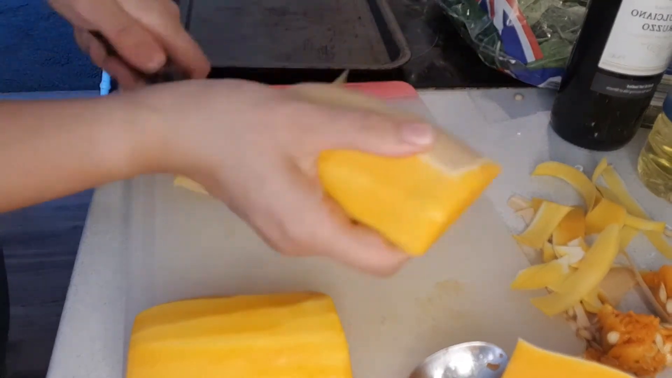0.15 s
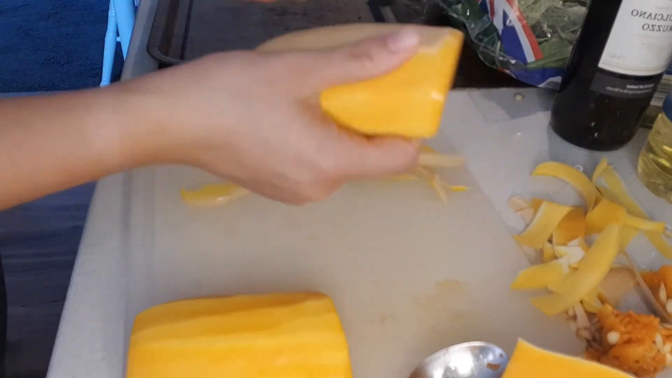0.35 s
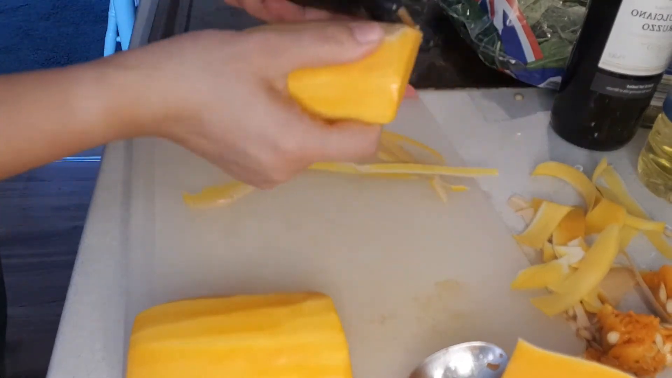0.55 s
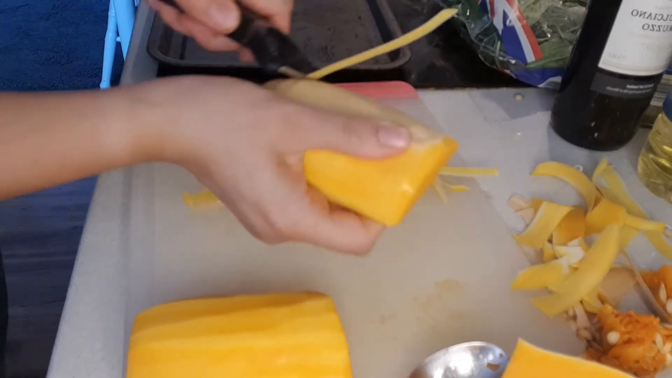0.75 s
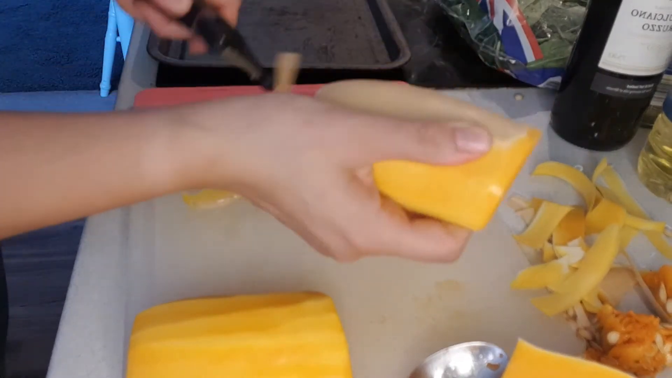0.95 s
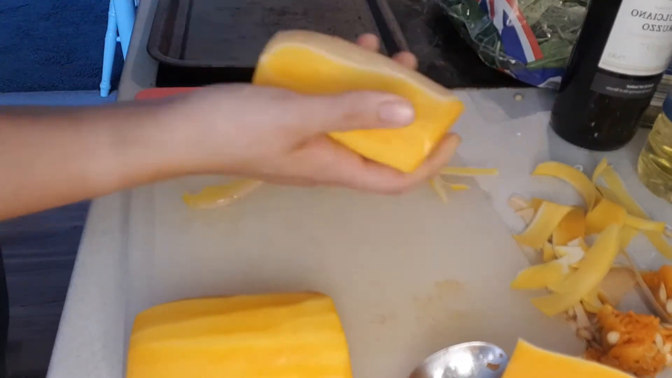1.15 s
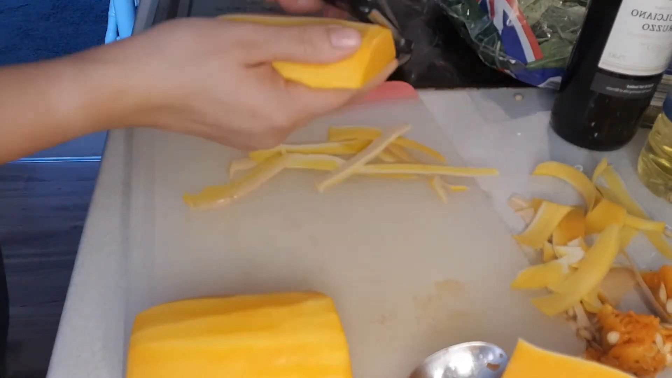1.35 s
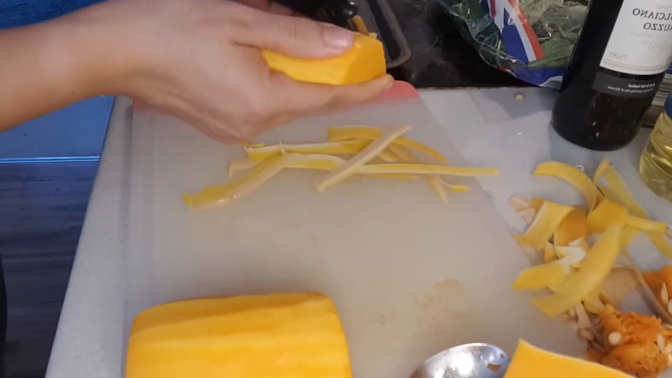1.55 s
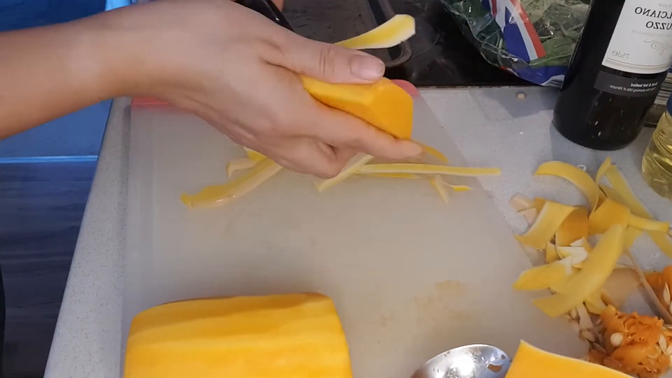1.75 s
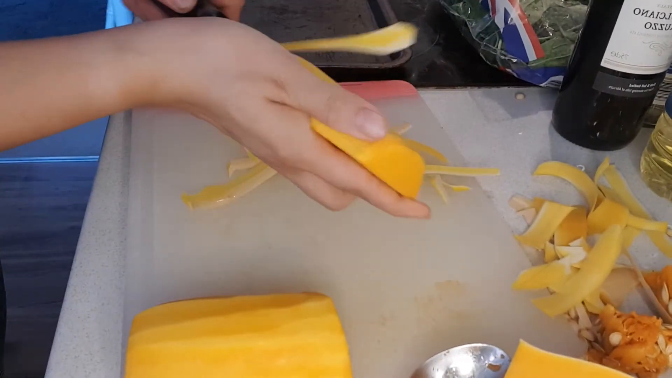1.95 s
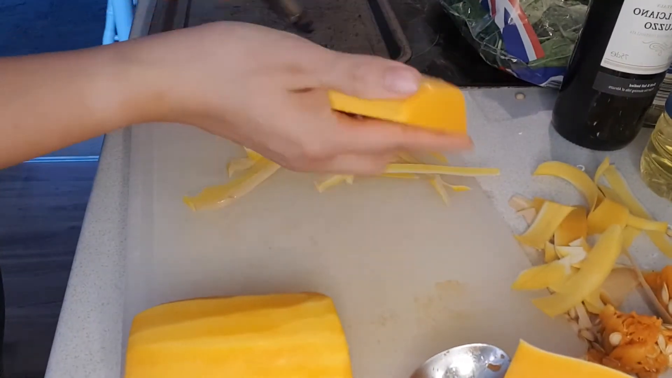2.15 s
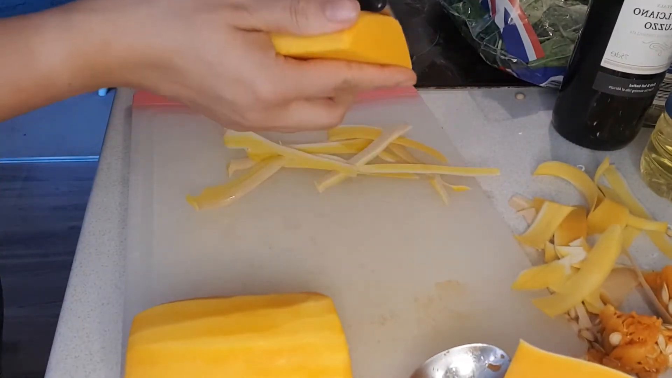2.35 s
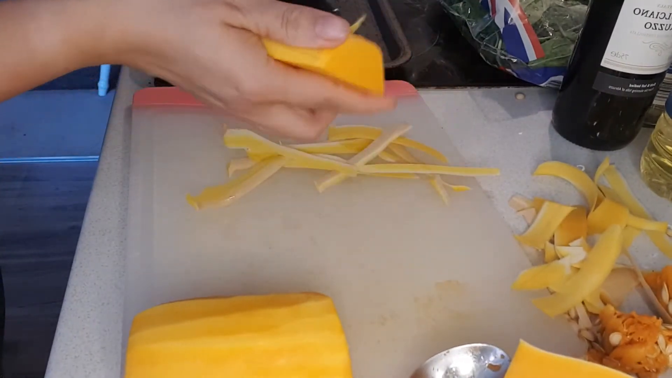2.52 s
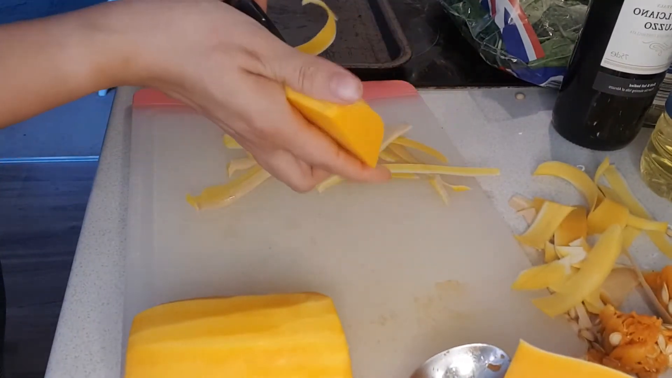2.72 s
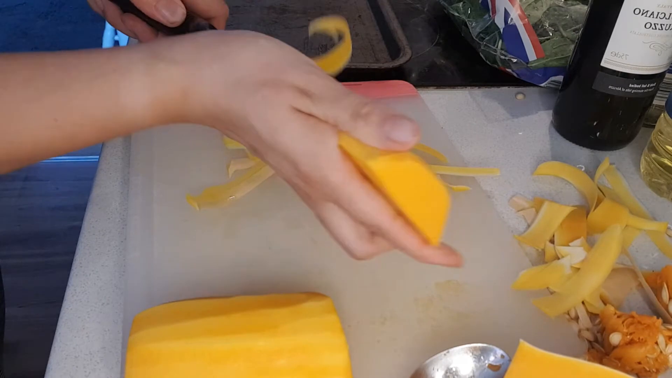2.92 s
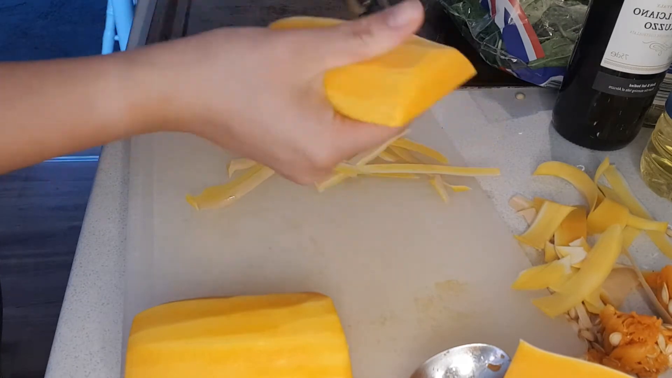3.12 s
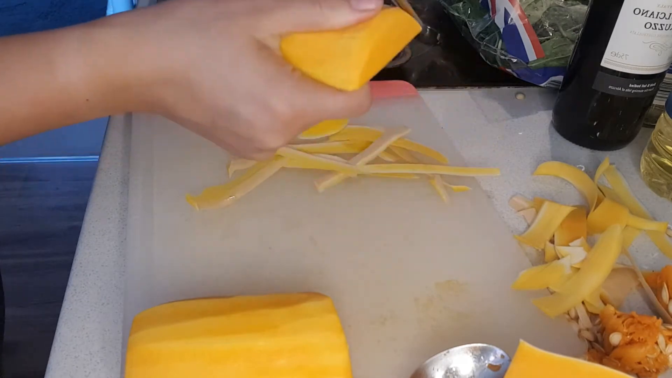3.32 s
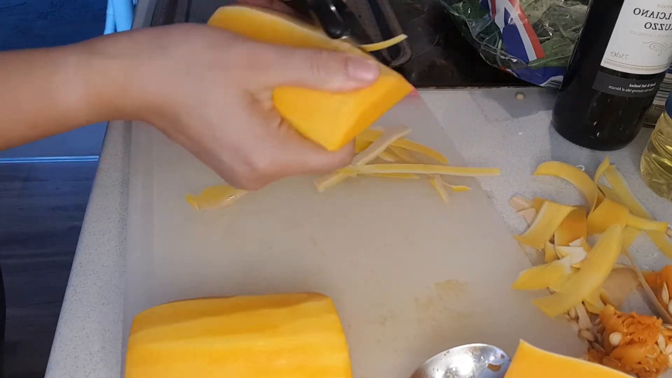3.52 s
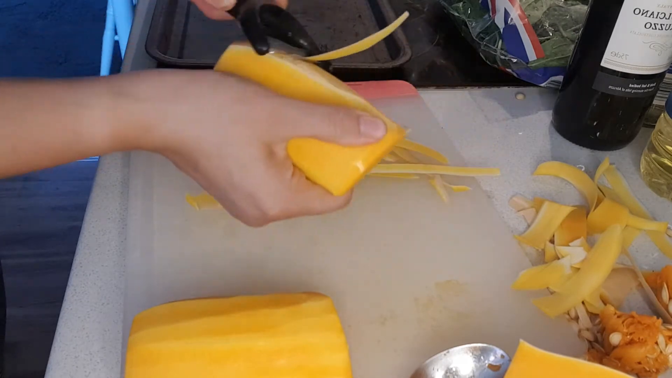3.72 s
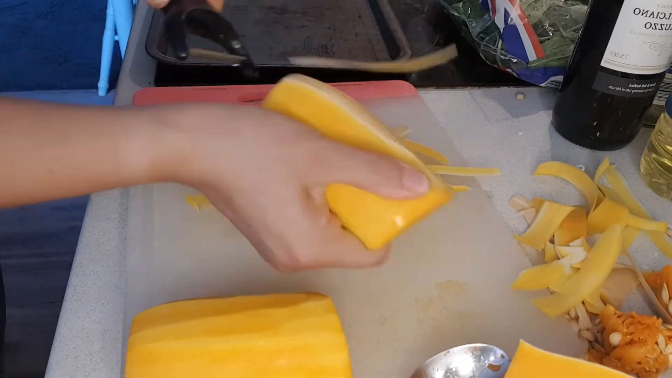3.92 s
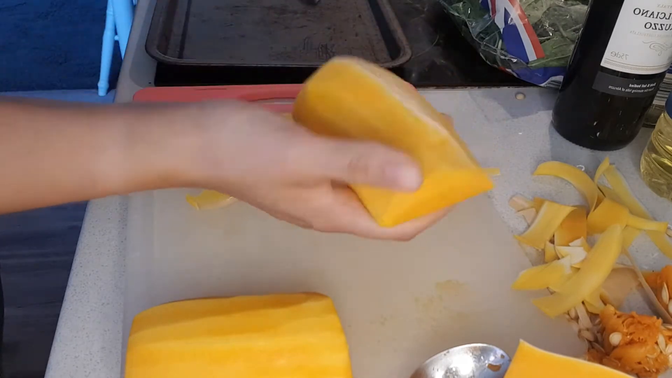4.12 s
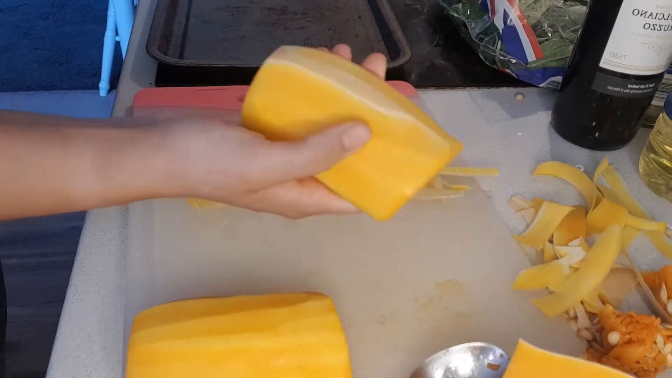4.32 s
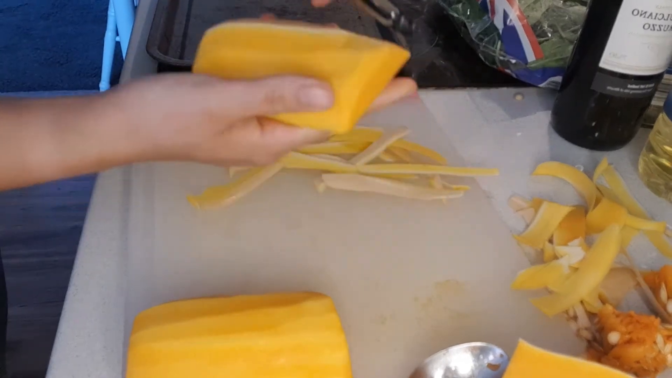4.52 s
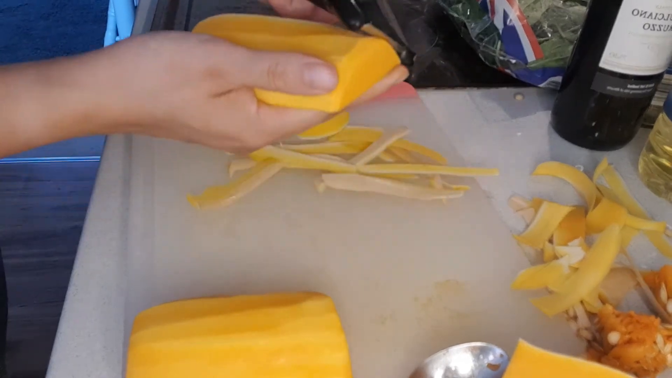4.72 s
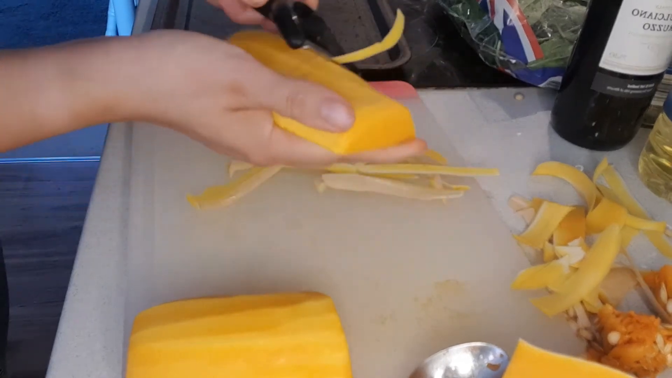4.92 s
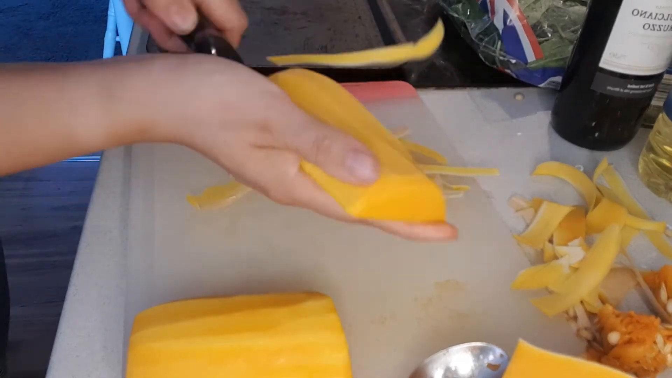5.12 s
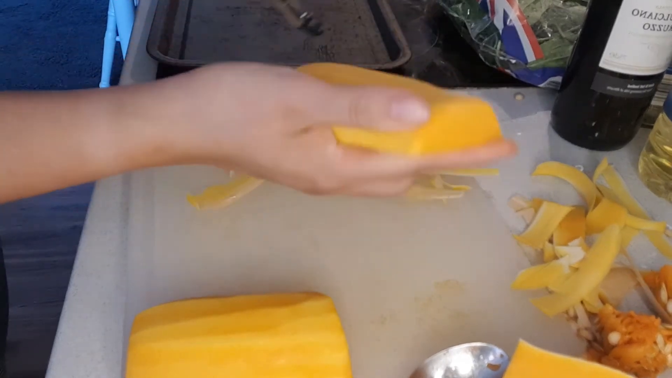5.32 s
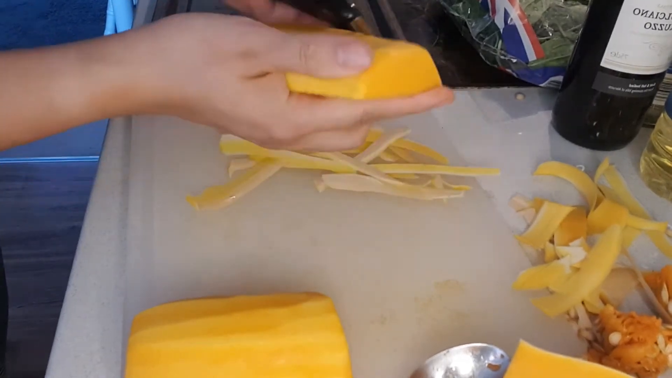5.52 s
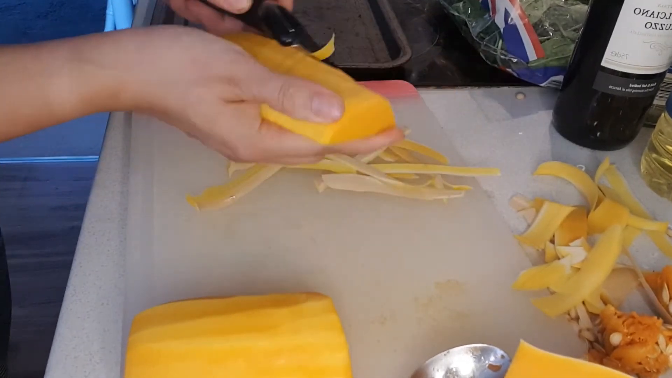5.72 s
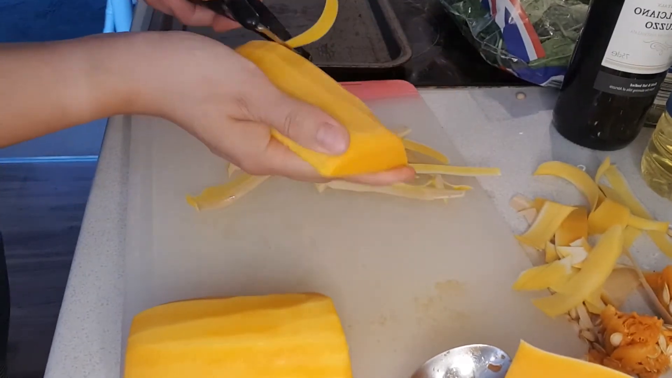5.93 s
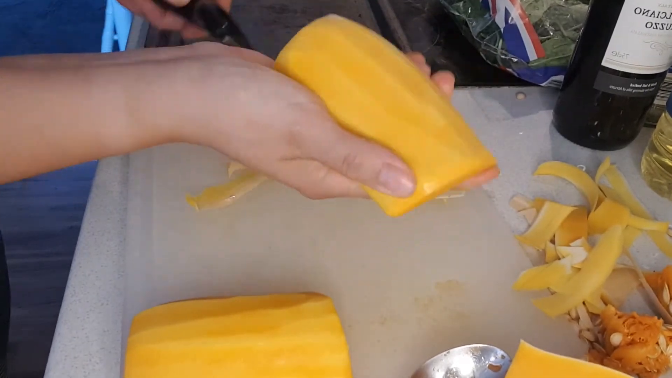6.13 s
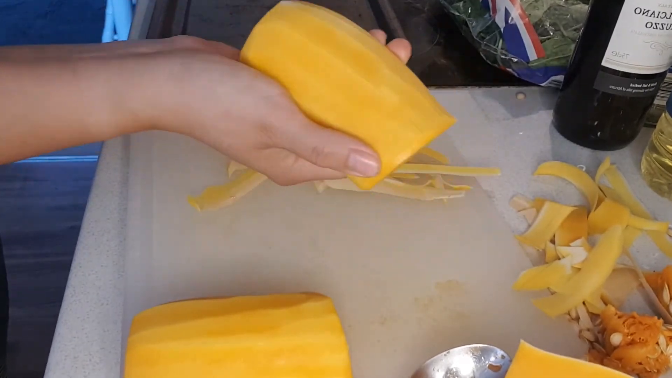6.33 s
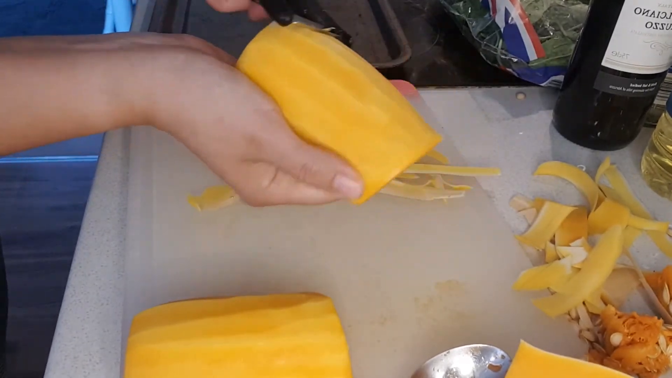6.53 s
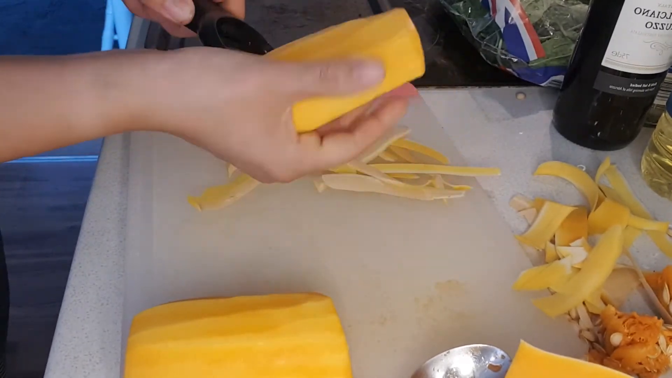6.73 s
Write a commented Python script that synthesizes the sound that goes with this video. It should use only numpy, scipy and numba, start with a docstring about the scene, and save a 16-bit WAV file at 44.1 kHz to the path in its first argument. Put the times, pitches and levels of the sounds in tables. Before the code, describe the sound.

Close stereo view of a peeler on raw squash in a small kitchen. Short crisp rasps come about once a second, most preceded by a clack as the loose blade lands and ended by a bright snap with a faint steel ring. Damp strips occasionally pat onto the board. A steady low fridge hum, quieter at first and fuller after two seconds, runs throughout.

```python
"""A crisp rasp over a low fridge hum comes first: a swivel peeler takes strips off a raw squash in a small kitchen.
Each rasp is a rush of tiny random bursts, shaped by the hand's pressure and by peeler, squash and curling strip.
Knocks are short noise bursts: the loose blade clacks onto the skin or snaps free, and its steel rings as fading tones.
Damp strips pat onto the cutting board, and one soft, deep bump is heard. Reflections surround the peeling.
The fridge is a set of steady and wavering tones, with a rush of room air and a faint hiss around it."""
import sys
import numpy as np
from scipy import signal
from scipy.fft import rfft, irfft, next_fast_len
from scipy.io import wavfile
from numba import njit

SR = 44100
rng = np.random.default_rng(int(sys.argv[2]) if len(sys.argv) > 2 else 0)


def pcm_store(signal):
    """Save signal as 16-bit PCM."""
    levels = np.round(np.clip(np.atleast_2d(signal), -1, 1) * 32767)
    wavfile.write(sys.argv[1], SR, levels.astype(np.int16).T)


N = 302789
TIME = np.arange(N) / SR  # seconds

# The blade is drawn along the squash. Each row: start in seconds, length in seconds, relative level in dB,
# digging-in time in seconds, change of pressure over the stroke in dB, fine crackle in dB, hollow body in dB,
# resonance of the curling strip at the start in Hz and at the end in Hz.
STROKES = [(0.0, 0.094, -48, 0.00067, 0.5, -3.5, -10, 3190, 2910),
           (0.096, 0.048, -51.5, 0.0018, -1, -9, -16, 4000, 4120),
           (0.3, 0.061, -65.5, .005, -3.5, -29.5, -7.5, 4010, 3590),
           (0.571, 0.25, -43.5, 0.03, -3, -3, -12, 4530, 3520),
           (1.534, 0.2, -46.5, 0.049, 2, -6.5, -16, 4190, 3860),
           (1.819, 0.13, -42, .03, -4.5, -4.5, -11, 5100, 4690),
           (2.392, 0.038, -45.5, .003, -1, -3, -14.5, 4100, 3960),
           (2.527, 0.077, -43, 0.0087, 3.5, -5.5, -13.5, 4000, 3200),
           (2.721, 0.15, -38.5, 0.006, -7, -7, -14.5, 4650, 4370),
           (3.412, 0.11, -46, 0.011, 0, -7.5, -18, 3350, 3800),
           (3.564, 0.31, -45.5, 0.024, 0, -6.5, -12, 4780, 5600),
           (4.739, 0.36, -42, 0.014, -2.5, -6, -14, 3394, 5180),
           (5.152, 0.024, -49, .015, -3, -14, -6.5, 4970, 4850),
           (5.682, 0.27, -41, 0.015, -4, -2, -15, 4380, 3700),
           (6.629, 0.17, -68, 0.004, -7, -5, -4, 4900, 3940)]
# Colour of the cut. Each row: frequency in Hz, relative strength in dB.
RASP_COLOUR = [(320, -39), (550, -13), (750, -9.5), (816, -9), (1010, -16), (1410, -7), (2070, -2.5),
               (2450, -2.5), (3070, 0), (4370, -6), (5720, -1.5), (6310, -6.5), (8020, -19.5), (12900, -8),
               (16000, -17.5)]
# Peeler frame and squash, driven by the cut. Each row: frequency in Hz, width in Hz, boost in dB.
FRAME = [(1040, 160, 11.5), (2090, 180, 8), (5660, 180, 1)]
# Compressor tones. Each row: multiple of the shaft rate, average (rms) level in dB before waver and swell,
# left minus right in dB.
COMPRESSOR = [(2, -54.5, 0), (3, -46, 0), (4, -62.5, 0), (5, -69, -3), (7, -62, 6), (8, -54, 1),
              (9, -64.5, 3), (10, -67.5, 0), (11, -68, 0), (12, -68.5, 3), (13, -72, 0), (17, -79, 2)]
# Extra tones above the mains hum. Each row: distance above it in shaft rates, average (rms) level in dB
# before waver and swell, left minus right in dB.
MOTOR = [(4, -72, 5), (5, -62, 4), (6, -73, 2), (7, -74, 2)]
# The hum and the room air swell. Each row: time in seconds, level change in dB.
SWELL = [(0, -4), (1.4, -4), (1.9, -0.3), (2.3, 0.26), (6.87, 0)]
# Colour of the room air. Each row: frequency in Hz, relative strength in dB.
AIR_COLOUR = [(20, -6), (36, -3), (50, 3), (66, 2), (110, -4), (220, -11), (340, -8), (520, -12),
              (800, -19), (1300, -30), (2500, -39), (8000, -52)]
# Colour of the microphone hiss. Each row: frequency in Hz, relative strength in dB.
HISS_COLOUR = [(1000, -13), (3000, -7.5), (5200, -1), (6500, -3), (7800, -24), (11500, 5), (15500, 3)]
# Strips of peel fall on the board. Each row: time in seconds, relative level in dB,
# tilt in dB per octave, main resonance in Hz.
DROPS = [(0.376, -32.5, 1, 3170), (0.399, -37.5, 0.5, 2700), (2.175, -35.5, -3.5, 880),
         (2.998, -20.5, 3, 1510), (4.029, -35.5, 9, 4530), (4.033, -37, 2.5, 853), (5.241, -35.5, -7, 870),
         (5.251, -32, -3, 900)]
# Colour of the falling peel. Each row: frequency in Hz, relative strength in dB.
PAT_COLOUR = [(200, -16), (500, -7), (900, 1), (1500, -5), (2800, -5), (5000, -11.5), (8000, -28.5),
              (16000, -33.5)]
# The blade lands on the skin and rebounds. Each row: time in seconds, relative level in dB,
# tilt in dB per octave, relative blade ring in dB, wait until the rebound in seconds,
# rebound level relative to the landing in dB, resonance of the rebound in Hz.
LANDINGS = [(0.471, -23.5, -0.5, -17, 0.0048, 5.5, 2970), (1.357, -20, 0, -23, 0.015, -11, 2320),
            (2.348, -19.5, 0, 4, .006, 2, 2260), (3.3, -23.5, -1, -11.5, 0.0018, -6.5, 2170),
            (3.320, -20.5, 0, -19, 0.0042, 1, 2150), (4.562, -21.5, .8, -7, 0.0093, 6, 2830),
            (5.506, -18, -1.2, -1, 0.011, -2.5, 2100), (6.448, -18, -1.5, 2.5, .002, -7, 850)]
# Colour of the landing blade. Each row: frequency in Hz, relative strength in dB.
CLACK_COLOUR = [(250, -39), (550, -9.5), (900, -9), (1700, -7), (2250, 2), (2900, -1.5), (5400, 1.5),
                (6600, -2), (7700, -16), (9000, -8.5), (11500, -3.5), (14000, -2), (16000, -12.5)]
# The strip tears off and the blade flips against its stop. Each row: time in seconds, relative level in dB,
# tilt in dB per octave, main resonance in Hz, chatter fading time in seconds, relative blade ring in dB.
SNAPS = [(0.822, -21, 0, 5530, 0.0032, 7.5), (0.887, -43, -1, 4450, .0018, 16.5),
         (1.958, -18.5, -4, 4640, 0.0025, -9), (1.966, -30.5, -3.5, 1960, 0.0022, -10),
         (1.982, -25.5, 2, 4700, 0.0013, -6), (2.012, -30.5, 0.5, 1970, .0038, -13),
         (2.204, -46, -2, 3010, 0.0053, -17), (2.854, -25, -2.2, 4040, 0.0026, -4),
         (2.886, -22, 1.5, 3400, .002, 0), (2.908, -23, 1.5, 5500, .0015, 7.5),
         (2.925, -25, -1, 5450, .0035, -10), (3.883, -21, 3, 5620, 0.0026, -2),
         (4.828, -25, 0, 3500, 0.0046, -1.5), (5.098, -21.5, -4, 5630, 0.0013, -2),
         (5.106, -14, -1, 4600, 0.00049, -13), (5.113, -26.5, -3, 1970, 0.0026, -7),
         (5.977, -21.5, 0, 5370, 0.0028, -3), (6.007, -26, 0, 4150, 0.0019, -11),
         (6.035, -36.5, -3, 5400, .002, -7.5), (6.662, -43.5, -2.5, 2460, 0.0025, 4)]
# Colour of the freed blade. Each row: frequency in Hz, relative strength in dB.
SNAP_COLOUR = [(250, -35.5), (600, -21), (1000, -11.5), (1700, -7.5), (2020, 2.5), (2550, -7.5), (3200, 0),
               (5700, 0.5), (6600, -5.5), (7600, -20.5), (9300, -13.5), (11500, -7.5), (16000, -18.5)]
# Ringing tones of the steel blade. Each row: frequency in Hz, typical relative level in dB,
# time to fade by 60 dB in seconds.
BLADE = [(2100, -13, .15), (4340, -14, .15), (5460, -7, .1), (8200, -20, .12), (8700, -18, .12),
         (11240, -7, .13), (13105, -5, .17), (13260, -4, .22), (15040, -9, .16)]
# Fading of the kitchen's echo. Each row: frequency in Hz, time to fade by 60 dB in seconds.
KITCHEN_FADE = [(500, 0.35), (1300, 0.33), (3500, 0.26), (9000, 0.28), (15000, 0.23)]
# Left-right balance of the microphones. Each row: frequency in Hz, left minus right in dB.
BALANCE_DB = [(400, -11), (900, 6.5), (1500, -1), (2000, 3), (2600, -1), (5700, -1), (7200, 4.5), (8700, 7),
              (10500, 5), (13000, 3), (16000, -3.5)]
# How alike the two microphones hear. Each row: frequency in Hz, likeness from 0 to 1.
LIKENESS = [(100, .985), (290, .8), (640, .5), (1400, .03)]

ENTRY_DB = -12  # the edge first skims the skin this much more quietly
RELEASE_DB_PER_S = 351.5  # the hand lets up at the end of the stroke
SKIM_DULL = 0.75  # extra dB of fine crackle lost per dB of lighter pressure
BODY_RISE_DB = 7  # the squash sounds hollower as the blade nears its end
UNEVEN_DB, UNEVEN_PER_S = 1.3, 28  # the hand's pressure wanders
MAINS_HZ, SHAFT_HZ = 99.97, 40.477
AIR_DB, HISS_DB = -55, -69.5  # average (rms) levels; the air also follows the swell
DROP_CHATTER_S, LANDING_CHATTER_S, REBOUND_CHATTER_S = 0.00076, 0.005, 0.0033
LANDING_HZ = 5500  # the edge strikes first, then the frame
RIGHT_LAG_S = .00016  # direct sound reaches the right microphone later
CUTOFF_HZ = 15900


def from_db(db):
    """Turn decibels into a plain amplitude factor."""
    return 10 ** (np.asarray(db) / 20)


def rms_one(x):
    """Scale a sound to an average (rms) level of 1."""
    return x / np.sqrt(np.mean(x ** 2) + 1e-20)


def at_hz(points, hz):
    """Read a table between its rows, on a log-frequency axis."""
    points = np.array(points)
    return np.interp(np.log(np.maximum(hz, 1)), np.log(points[:, 0]), points[:, 1])


def left_right(db):
    """Share a left-minus-right difference evenly between the two channels."""
    return from_db(np.array([np.atleast_1d(db), -np.atleast_1d(db)]) / 2)


def hump(hz, centre, width):
    """Bell of height 1 around a resonance."""
    return 1 / (1 + (2 * (hz - centre) / width) ** 2)


def colour(x, db_at):
    """Filter a sound by a gain in dB that depends on frequency, without sounding early (minimum phase)."""
    size = 2 * next_fast_len(x.shape[-1] // 2 + 2048)
    hz = np.arange(size // 2 + 1) * SR / size
    cepstrum = irfft(np.log(from_db(db_at(hz))))
    # folding the cepstrum forward in time gives the minimum-phase filter
    cepstrum[..., 1:size // 2] *= 2
    cepstrum[..., size // 2 + 1:] = 0
    response = np.exp(rfft(cepstrum))
    return irfft(rfft(x, size) * response)[..., :x.shape[-1]]


def drift(rate):
    """Wandering random curve of spread 1 that heads for a new value rate times a second."""
    values = rng.standard_normal(4096)
    # the factor makes up for the spread lost by joining values with lines
    return np.interp(TIME * rate, np.arange(4096), values) * np.sqrt(3 / 2)


def add(track, s, sound):
    """Mix a sound into a track, starting at s seconds."""
    start = max(round(s * SR), 0)
    track[start:start + len(sound)] += sound[:N - start]


@njit
def moving_resonance(x, hz, width_hz):
    """Two-pole resonator with gain 1 on top whose centre follows a curve."""
    r, y = np.exp(-np.pi * width_hz / SR), np.zeros(len(x))
    for i in range(2, len(x)):
        driven = (1 - r * r) / 2 * (x[i] - x[i - 2])
        y[i] = driven + 2 * r * np.cos(2 * np.pi * hz[i] / SR) * y[i - 1] - r * r * y[i - 2]
    return y


def strokes():
    """The edge digs in, travels and is let up: gains of bite, crackle and body, and the strip's resonance in Hz."""
    level, crackle, body, strip_hz = np.zeros((4, N))
    for s, length_s, db, dig_s, change_db, crackle_db, body_db, start_hz, end_hz in STROKES:
        t, begun = np.maximum(TIME - s, 0), TIME >= s
        travel = np.minimum(t / length_s, 1)  # 0 at the start, 1 at the end
        skim_db = ENTRY_DB * np.exp(-t / dig_s)
        release_db = RELEASE_DB_PER_S * np.clip(t - length_s, 0, 1)
        force = begun * from_db(db + skim_db + change_db * travel - release_db)
        level += force
        crackle += force * from_db(crackle_db + SKIM_DULL * (skim_db + change_db * travel))
        body += force * from_db(body_db + BODY_RISE_DB * (travel - .5))
        strip_hz = np.where(begun, start_hz + (end_hz - start_hz) * travel, strip_hz)
    pressure = from_db(UNEVEN_DB * drift(UNEVEN_PER_S))
    return pressure * level, pressure * crackle, pressure * body, strip_hz


def rasp(cells_per_s, spread_db, judder_db, judder_rate, catch_db, strip_db, strip_width_hz,
         body_db, bite_db, crackle_db):
    """Cells burst at the edge in their thousands; the blade judders, and frame and curling strip colour the sound."""
    level, crackle, body, strip_hz = strokes()
    happens = rng.random(N) < cells_per_s / SR
    size_db = spread_db * np.minimum(rng.exponential(1, N), 5)
    bursts = happens * rng.choice([-1, 1], N) * from_db(size_db)
    # tougher fibres make the edge catch
    bursts = bursts * from_db(judder_db * drift(judder_rate) + catch_db * drift(38))

    def cut_colour(hz):
        return at_hz(RASP_COLOUR, hz) + sum(db * hump(hz, f, width) for f, width, db in FRAME)

    cut = colour(bursts, cut_colour)
    strip_hz = strip_hz * np.exp(.07 * drift(45))
    cut = cut + from_db(strip_db) * moving_resonance(cut, strip_hz, float(strip_width_hz))

    def below(hz):
        return signal.sosfiltfilt(signal.butter(4, hz, fs=SR, output="sos"), cut)

    # squash body, bite of the edge and fine crackle are three registers of the same bursts
    low, middle = below(1700), below(8000)
    registers = [(body_db, body, low), (bite_db, level, middle - low), (crackle_db, crackle, cut - middle)]
    return sum(from_db(db) * force * rms_one(band) for db, force, band in registers)


def microphone_pair(x):
    """The two microphones sit close together, so they hear long waves alike."""
    mid = colour((x[0] + x[1]) / 2, lambda hz: 10 * np.log10(1 + at_hz(LIKENESS, hz)))
    side = colour((x[0] - x[1]) / 2, lambda hz: 10 * np.log10(1 - at_hz(LIKENESS, hz)))
    return np.array([mid + side, mid - side])


def room_response(near_db, near_s, tail_db):
    """Direct sound, quick reflections off board and worktop, then the room's tail, different at each microphone."""
    t = TIME[:SR // 3]
    edges = np.geomspace(200, 18000, 9)
    tail = 0
    for low, high in zip(edges, edges[1:]):
        band_filter = signal.butter(2, [low, high], "band", fs=SR, output="sos")
        band = signal.sosfilt(band_filter, rng.standard_normal((2, len(t))))
        t60 = at_hz(KITCHEN_FADE, np.sqrt(low * high))
        tail = tail + band * np.exp(-np.log(1000) * t / t60)
    tail = tail * np.clip(t / 0.0075, 0, 1)  # the tail builds up over 7.5 ms
    near = rng.standard_normal((2, len(t))) * np.exp(-t / near_s)

    def unit(h):
        return h / np.sqrt(np.sum(h ** 2, axis=1, keepdims=True))

    response = from_db(near_db) * unit(near) + from_db(tail_db) * unit(tail)
    response[[0, 1], [0, round(RIGHT_LAG_S * SR)]] += 1  # direct sound
    heard = microphone_pair(unit(response))
    return colour(heard, lambda hz: at_hz(BALANCE_DB, hz) * np.array([[.5], [-.5]]))


def kitchen(x, near_db, near_s, tail_db, count):
    """The hands keep moving, so the sound passes through the reflections of one position after another."""
    position = np.cumsum(7 * from_db(3 * drift(2))) / SR  # around 7 positions a second
    out = 0
    for k in range(count):
        # the positions form a loop, and neighbours fade into each other
        distance = np.abs((position - k + count / 2) % count - count / 2)
        share = np.cos(np.pi / 2 * np.clip(2 * distance - .5, 0, 1))
        response = room_response(near_db, near_s, tail_db)
        out = out + signal.oaconvolve((x * share)[None], response, axes=1)[:, :N]
    return out


def fridge(mains_db, waver_db):
    """Mains hum of the motor and slightly wavering harmonics of the slower compressor shaft."""
    def tone(hz, db):
        return from_db(db) * np.sqrt(2) * np.sin(2 * np.pi * (hz * TIME + rng.random()))

    lines = [(k * SHAFT_HZ, db, pan) for k, db, pan in COMPRESSOR]
    lines += [(MAINS_HZ + k * SHAFT_HZ, db, pan) for k, db, pan in MOTOR]
    mains = tone(MAINS_HZ, mains_db + .25 * drift(5))
    return mains + sum(left_right(pan) * tone(hz, db + waver_db * drift(4)) for hz, db, pan in lines)


def air():
    """Low rush of the room: coloured noise, alike at both microphones in the lows."""
    noise = colour(rng.standard_normal((2, N)), lambda hz: at_hz(AIR_COLOUR, hz))
    return rms_one(microphone_pair(noise))


def microphone_hiss():
    """Coloured noise, independent in each microphone."""
    return rms_one(colour(rng.standard_normal((2, N)), lambda hz: at_hz(HISS_COLOUR, hz)))


def contact(spectrum, tilt_db, main_hz, chatter_s, boost_db=6.5, width_share=0.22):
    """Tiny collisions that die within milliseconds, coloured by the spot that is struck; unit energy."""
    t = TIME[:2048]
    envelope = np.exp(-t / chatter_s) * (1 - np.exp(-2 * t / chatter_s))
    burst = rng.standard_normal(len(t)) * envelope

    def spot_colour(hz):
        tilt = tilt_db * np.log2(np.clip(hz, 500, 12000))
        return at_hz(spectrum, hz) + tilt + boost_db * hump(hz, main_hz, width_share * main_hz)

    burst = colour(burst, spot_colour)
    return burst / np.sqrt(np.sum(burst ** 2))


def drops(pat_db):
    """Damp strips land with a dull pat."""
    out = np.zeros(N)
    for s, db, tilt_db, main_hz in DROPS:
        add(out, s, from_db(db + pat_db) * contact(PAT_COLOUR, tilt_db, main_hz, DROP_CHATTER_S))
    return out


def blade_ring():
    """Every knock shares itself a little differently among the blade's fading tones."""
    t = TIME[:SR // 2]
    return sum(from_db(db + rng.normal(0, 2.5) - 60 * t / t60) * np.sin(2 * np.pi * hz * t)
               for hz, db, t60 in BLADE)


def knock(spectrum, db, tilt_db, main_hz, chatter_s, knock_db, ring_db):
    """The loose blade rattles in its pivots and rings on."""
    out = from_db(db + ring_db) * blade_ring()
    add(out, 0, from_db(db + knock_db) * contact(spectrum, tilt_db, main_hz, chatter_s))
    return out


def landings(knock_db, ring_db):
    """The edge clacks onto the skin, and the frame follows a few milliseconds later."""
    out = np.zeros(N)
    for s, db, tilt_db, blade_db, rebound_s, rebound_db, rebound_hz in LANDINGS:
        clack = knock(CLACK_COLOUR, db, tilt_db, LANDING_HZ, LANDING_CHATTER_S, knock_db, blade_db + ring_db)
        add(out, s, clack)
        rebound = contact(CLACK_COLOUR, tilt_db, rebound_hz, REBOUND_CHATTER_S)
        add(out, s + rebound_s, from_db(db + rebound_db + knock_db) * rebound)
    return out


def snaps(knock_db, ring_db):
    """The freed blade hits its stop."""
    out = np.zeros(N)
    for s, db, tilt_db, main_hz, chatter_s, blade_db in SNAPS:
        add(out, s, knock(SNAP_COLOUR, db, tilt_db, main_hz, chatter_s, knock_db, blade_db + ring_db))
    return out


def bump(s, hz, level_db, rise_s):
    """One soft, deep bump: a low tone that swells and dies away."""
    t = np.maximum(TIME - s, 0)
    envelope = t / rise_s * np.exp(1 - t / rise_s)  # reaches 1 after rise_s
    return from_db(level_db) * envelope * np.sin(2 * np.pi * hz * t)


def scene():
    """Peeling in the kitchen's reflections, over the fridge, room air, hiss and one bump."""
    cutting = rasp(cells_per_s=3500, spread_db=2.0, judder_db=2.0, judder_rate=390, catch_db=0.8,
                   strip_db=0.0, strip_width_hz=2400, body_db=2.0, bite_db=2.5, crackle_db=3.0)
    falling = drops(pat_db=16.0)
    landing = landings(knock_db=18, ring_db=-18)
    snapping = snaps(knock_db=18.0, ring_db=-16.5)
    peeling = kitchen(cutting + falling + landing + snapping, near_db=6, near_s=0.0055, tail_db=0.5, count=7)
    swell = from_db(np.interp(TIME, *np.transpose(SWELL)))
    hum = swell * (fridge(mains_db=-33.5, waver_db=1.8) + from_db(AIR_DB) * air())
    hiss = from_db(HISS_DB) * microphone_hiss()
    return peeling + hum + hiss + bump(s=2.35, hz=52.8, level_db=-42.5, rise_s=0.065)


def record(dry):
    """The top is cut steeply by a low-pass filter."""
    return signal.sosfilt(signal.ellip(10, .1, 80, CUTOFF_HZ, fs=SR, output="sos"), dry)


dry = scene()
out = record(dry)
pcm_store(out)
```